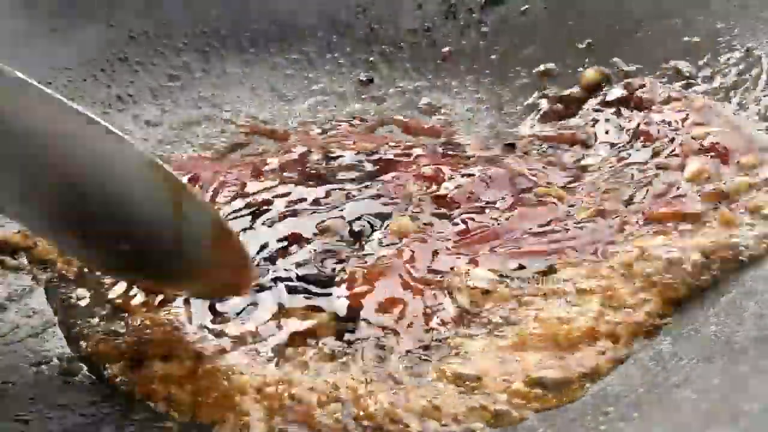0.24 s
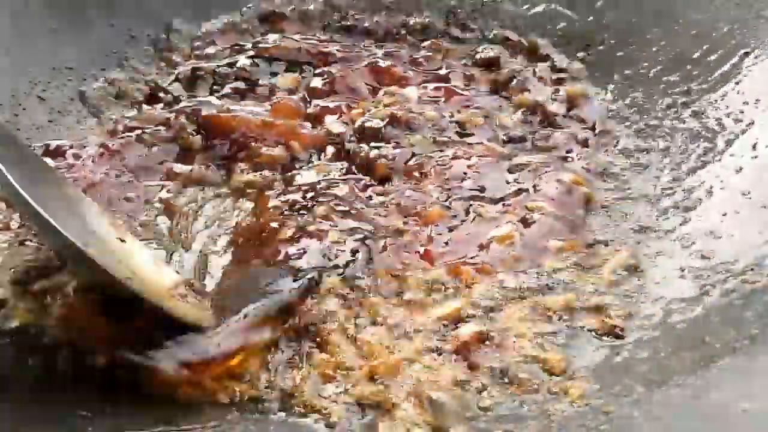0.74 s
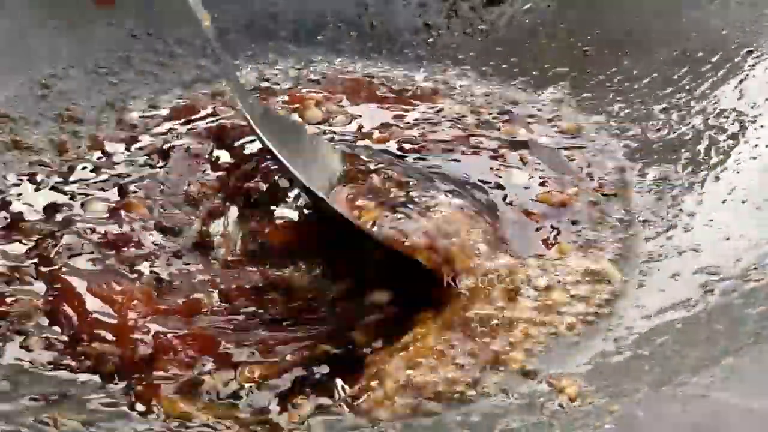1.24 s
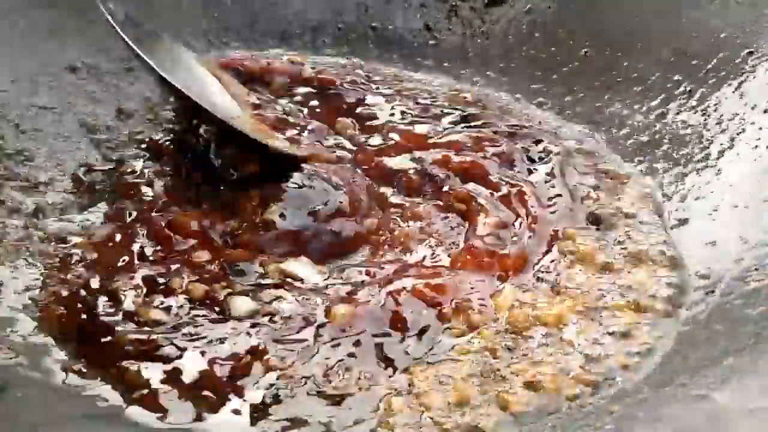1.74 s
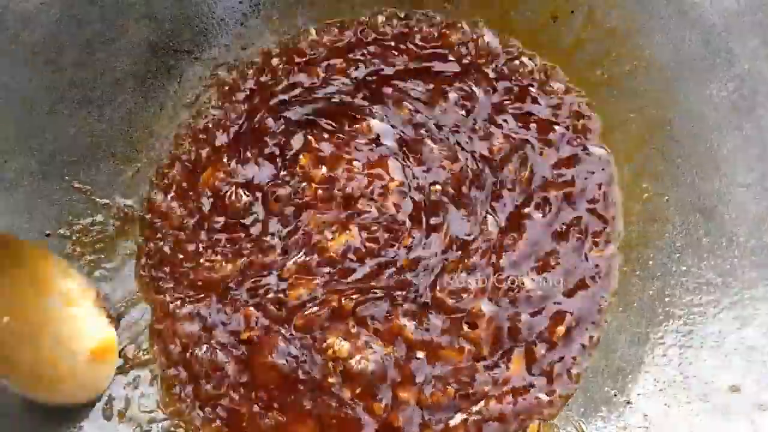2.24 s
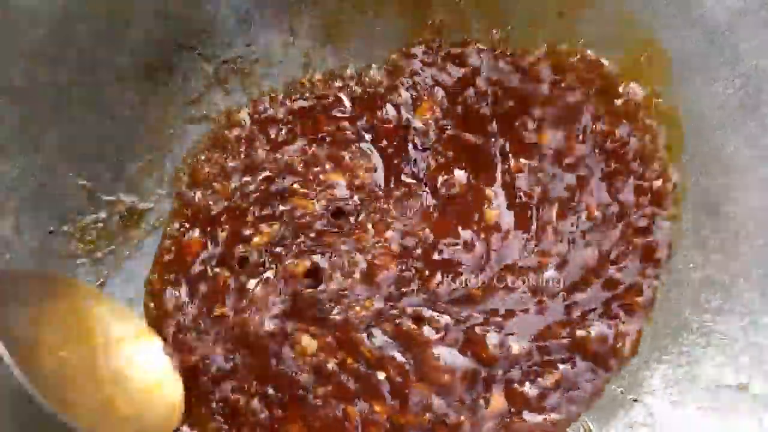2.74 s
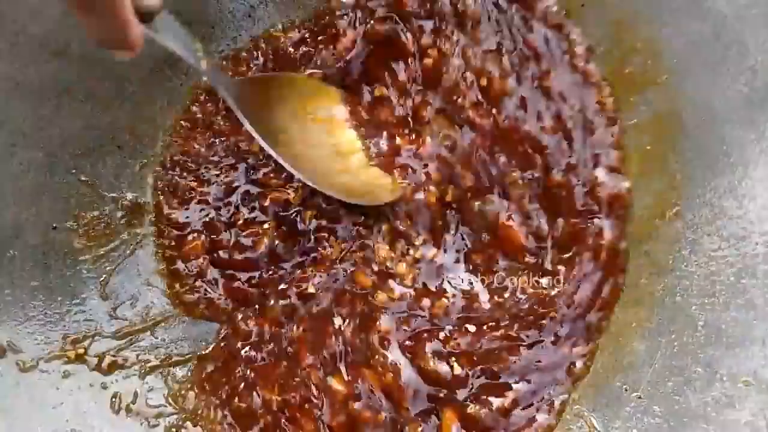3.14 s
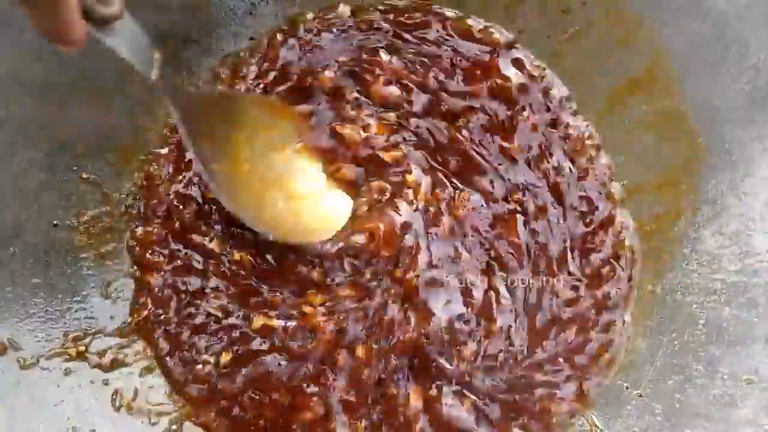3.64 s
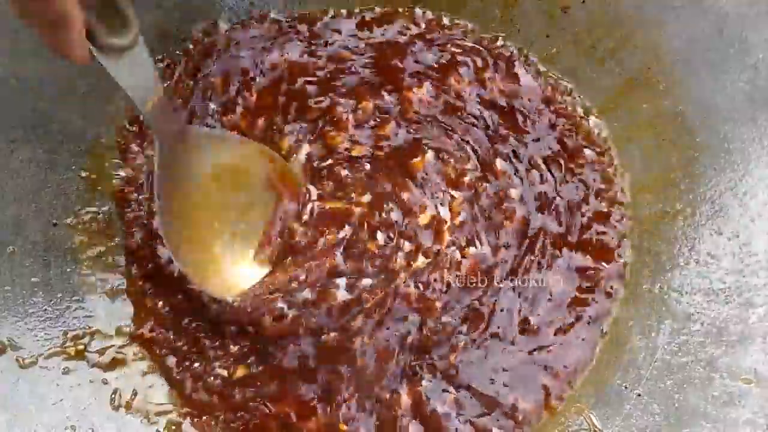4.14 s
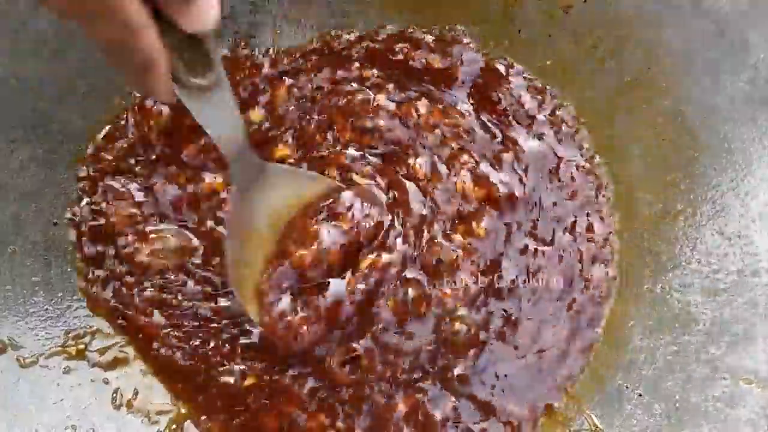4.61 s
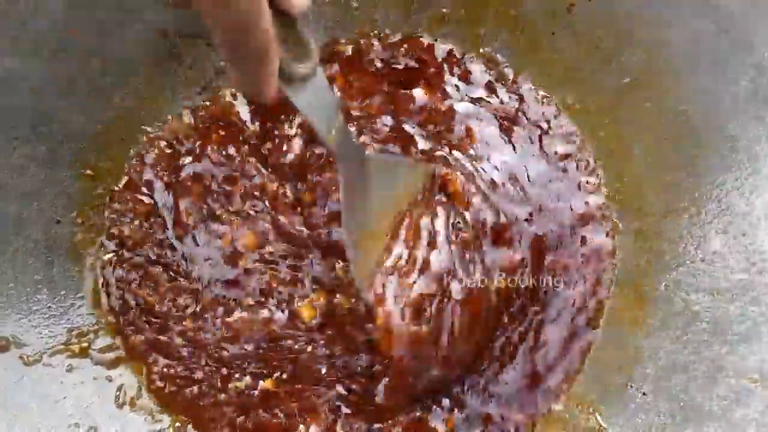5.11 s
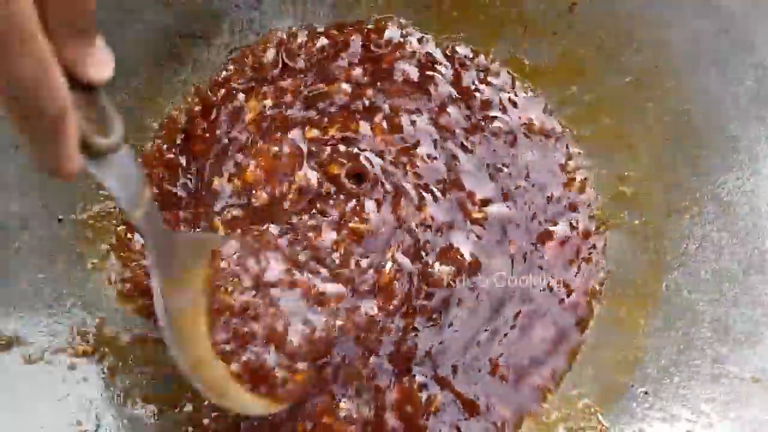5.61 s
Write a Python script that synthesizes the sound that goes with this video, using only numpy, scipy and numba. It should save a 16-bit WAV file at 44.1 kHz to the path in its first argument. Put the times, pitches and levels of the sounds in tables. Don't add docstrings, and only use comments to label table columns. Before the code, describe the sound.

From 0 to about 2.04 s, a fierce bright sizzle fills the close, dry stereo picture: dense spitting and hissing over a faint burner rush, easing slightly around 0.4-0.7 s and swelling again. A metal spoon scrapes the steel wok in uneven strokes, with a hard clack at 0.4 s, a strong gritty scrape near 0.5 s and further knocks at 0.75, 0.9 and 1.25 s. The treble leans left. The sound cuts off abruptly, leaves under a tenth of a second of silence, then a new section fades in over about 0.3 s. The thickened sauce simmers duller and lower, with less spitting and treble now leaning right. Short, hollow, raspy scrapes come several times a second from 2.4 s, mixed with clicks and soft low bowl thumps. Sharp knocks stand out near 5.0 and 5.23 s; a final cluster of scraping and thudding at 5.6-5.75 s leads to the abrupt end.

```python
import sys
import numpy as np
from scipy import signal
from scipy.fft import rfft, irfft, next_fast_len
from scipy.io import wavfile
from scipy.ndimage import uniform_filter1d
from numba import njit

SR = 44100
rng = np.random.default_rng(int(sys.argv[2]) if len(sys.argv) > 2 else 0)


def digitize_waveform(pressure):
    field = np.atleast_2d(pressure).T
    bounded = np.clip(field, -1, 1)
    quanta = np.round(bounded * 32767).astype(np.int16)
    wavfile.write(sys.argv[1], SR, quanta)


def gain_from_db(level_db):
    decades = np.asarray(level_db, float) / 20
    return 10 ** decades


N = 258867

# start in seconds, end in seconds.
PARTS = [
    (0, 2.039),
    (2.1215, 5.87),
]
# scrape level in dB,
# spoon hollow resonance in Hz, wok bowl level in dB, rasp level in dB.
TRAILING_SPOON = [
    (-33.5, 3420, -54.5, -48),
    (-35.5, 2440, -42, -51),
]
BOWL_HZ = 372


def frying(t, part, per_s, patchy_db):
    # time in seconds, level in dB.
    heat_curves = [
        [(0.0, -26.5), (.4, -30), (0.69, -31), (1.0, -26.5), (1.16, -28.5), (1.33, -26), (1.5, -27.5),
         (1.75, -26.5), (2.03, -26)],
        [(2.5, -46.5), (2.77, -50.5), (3.0, -44), (3.6, -49), (4.2, -47.5), (5.25, -48.5), (5.47, -54.5),
         (5.78, -42.5), (5.87, -47)],
    ]
    # frequency in Hz, density in dB per Hz.
    spectra = [
        [(40, -21.5), (200, -19.5), (260, -13), (370, -10), (640, -19.5), (1000, -14.5), (1500, -7.0),
         (2200, -7.5), (3300, -4), (4400, -0.5), (5200, -9), (8000, -11.5), (11000, -11.5), (15500, -18)],
        [(40, -15), (200, -15), (260, -0.5), (370, -4), (640, -4.5), (1000, -6.5), (1500, -6), (2200, -9),
         (3300, -1), (4400, -9), (5200, -9.5), (8000, -25), (11000, -22), (15500, -35.5)],
    ]
    part_level_db = [-24.5, -27]
    zone_centres_hz = [450, 2720, 8600]
    heat_shares = [(.1, .2, 1.24), (.3, .5, 1.27)]
    stir_shares = [(.05, .3, .05), (.1, .35, .2)]

    heat_db = in_time(heat_curves[part], t)[0]
    swell_db = lagging(stirring(t, part)[1], lag_s=0.36)
    zones_db = np.outer(heat_shares[part], heat_db) + np.outer(stir_shares[part], swell_db)
    zones_db -= np.median(zones_db, axis=1, keepdims=True)

    trains = [grains(per_s, 2.16, (3, len(t))) for _ in range(2)]
    trains = [two_ports(train[0], train[1:], part) for train in trains]
    out = 0
    together = drift(5.3, len(t))
    edges = 28 * 2 ** (np.arange(29) / 3)
    for k, (low, high) in enumerate(zip(edges, edges[1:])):
        hz = np.sqrt(low * high)
        shares = [np.interp(np.log(hz), np.log(zone_centres_hz), row) for row in np.eye(3)]
        flicker_db = patchy_db * (0.3 * together + 1.6 * drift(21.0, len(t)))
        gain = gain_from_db(at_hz(spectra[part], hz) + shares @ zones_db + flicker_db)
        out = out + gain * band(trains[k % 2], low, high)
    return out / np.sqrt(np.mean(out[0] ** 2)) * gain_from_db(part_level_db[part])


def stirring(t, part):
    # start in seconds, length in seconds, scrape level in dB,
    # spoon hollow resonance in Hz, wok bowl level in dB.
    thin_strokes = [(0.0, 0.028, -26, 3320, -40.5), (.19, 0.079, -37, 3400, -59),
                    (.47, 0.047, -21.5, 3400, -32), (.54, .11, -27, 3140, -37.5),
                    (.88, .16, -28, 3180, -43.5), (1.12, 0.032, -26.5, 3340, -41),
                    (1.23, .08, -36, 3000, -40.5), (1.38, 0.02, -34.5, 3100, -48),
                    (1.54, 0.15, -34.5, 3230, -47.5), (1.76, 0.036, -35, 3500, -56),
                    (1.92, 0.16, -37, 3300, -43.5)]
    # start in seconds, length in seconds,
    # scrape level in dB, spoon hollow resonance in Hz, wok bowl level in dB.
    thick_strokes = [(2.398, 0.075, -30, 2240, -36), (2.498, 0.055, -29.5, 2330, -45),
                     (2.577, 0.055, -29, 2500, -57), (2.933, 0.082, -27.5, 2100, -31.5),
                     (3.032, 0.099, -28, 2400, -47), (3.207, 0.12, -30, 2490, -50),
                     (3.389, 0.027, -30, 2450, -36), (3.537, 0.05, -27, 2310, -39),
                     (3.677, .1, -35, 2400, -47), (3.963, 0.029, -25.5, 2400, -37),
                     (4.12, 0.038, -35, 2560, -40), (4.238, .07, -30, 2700, -40),
                     (4.353, 0.057, -28, 2350, -40), (4.59, 0.046, -28.5, 2540, -42),
                     (4.672, 0.14, -31, 2400, -39), (4.93, 0.11, -29, 2480, -50),
                     (5.026, 0.085, -28, 2440, -35), (5.165, 0.08, -29, 2330, -43),
                     (5.38, 0.019, -32.5, 2520, -50), (5.615, 0.085, -26, 2460, -31),
                     (5.712, 0.13, -31.5, 2030, -40)]
    attack_s, release_s = 0.029, 0.021

    start, length, db, hz, bowl_db = np.transpose([thin_strokes, thick_strokes][part])[:, :, None]
    rest_db, rest_hz, rest_bowl_db, _ = TRAILING_SPOON[part]
    rise = np.clip((t - start) / attack_s + .5, 0, 1)
    fall = np.exp(-np.maximum(t - start - length, 0) / release_s)
    envelope = (rise * fall) ** 2
    stroke_power = envelope * gain_from_db(2 * db)
    rest_power = gain_from_db(2 * rest_db)
    scrape_power = rest_power + np.sum(stroke_power, axis=0)
    hollow_hz = (rest_power * rest_hz + np.sum(stroke_power * hz, axis=0)) / scrape_power
    bowl_power = gain_from_db(2 * rest_bowl_db) + np.sum(envelope * gain_from_db(2 * bowl_db), axis=0)
    scrape_db = 10 * np.log10(scrape_power)
    return scrape_db, scrape_db - rest_db, hollow_hz, 10 * np.log10(bowl_power)


def scrape(t, part):
    # frequency in Hz, width in Hz, level in dB.
    steel_modes = [(1208, 170, 2.5), (1540, 650, -0.5), (2160, 530, 1.5), (2520, 18, 17.5), (2865, 23, -11),
                   (3600, 54, -2), (3840, 17, 12), (4750, 330, 6.5), (5160, 140, 4.5)]
    bowl_hz = [433, BOWL_HZ][part]

    scrape_db, swell_db, hollow_hz, bowl_db = stirring(t, part)
    rasp_db = TRAILING_SPOON[part][-1] + 0.43 * lagging(swell_db, lag_s=0.092)
    pressure = gain_from_db(1.97 * drift(33.0, len(t)))
    slips = grains(5000, 2.7, (3, len(t))) * pressure

    hollow = glide(slips, hollow_hz, 545)
    steel = 0
    for k, (hz, width_hz, db) in enumerate(steel_modes):
        steel = steel + gain_from_db(db) * resonance(slips, hz, width_hz) * (-1) ** k
    steel = rms_one(steel)
    broad = rms_one(resonance(slips, 2600, 1900))
    bowl = rms_one(resonance(resonance(slips, bowl_hz, 300), bowl_hz, 78))
    rasp = rms_one(band(slips, 4300, 9500))

    body = gain_from_db(scrape_db) * (gain_from_db(1.5) * hollow + gain_from_db(-3.5) * steel + gain_from_db(-21.5) * broad)
    sound = body + gain_from_db(bowl_db) * bowl + gain_from_db(rasp_db + 5.5) * rasp
    return two_ports(sound[0], sound[1:], part)


def knocks():
    # time in seconds, peak level in dB, left over right in dB, centre in Hz.
    edge_knocks = [(0.0337, -12, -7, 4260), (0.395, -5, -6, 4320), (0.7558, -12, 5, 3600),
                   (0.897, -12.5, 11, 2760), (1.243, -20, -1, 3190), (2.4105, -14, -0.5, 2870),
                   (2.9303, -18, 5, 2520), (2.953, -11, 4, 2060), (3.0492, -17, -16, 1540),
                   (3.0847, -12, 0.5, 2510), (3.2116, -11.5, -1, 4600), (3.3645, -15, 8, 2490),
                   (3.403, -17, 8, 2560), (3.5224, -13, 5, 2270), (3.554, -15, 4, 2370),
                   (3.683, -15, 10, 2320), (3.7618, -17.5, 2, 1250), (3.855, -13.5, -9, 2430),
                   (3.986, -25, 6, 2360), (4.22, -19, 1.0, 1250), (4.299, -14, 1, 2590),
                   (4.3686, -17, 6, 2200), (4.587, -15, 12, 2170), (4.9272, -15, 6, 2220),
                   (4.9882, -15.5, 21, 2520), (5.0332, -22, 4.5, 2580), (5.2299, -9, -3, 2330),
                   (5.612, -29, -1, 2260), (5.635, -14, -7, 3620), (5.7483, -17, -6, 1520)]
    # time in seconds, peak level in dB, left over right in
    # dB, centre in Hz, decay in seconds.
    edge_skids = [(0.395, -4.5, 2, 2500, 0.0008), (0.471, -13.5, -5, 5400, 0.036),
                  (0.486, -13.5, 3, 3700, 0.035), (0.56, -15.5, -6, 1945, 0.03),
                  (0.616, -30, -9, 2020, 0.02), (3.357, -15.5, 10, 7200, 0.0081),
                  (3.689, -12.5, -3, 4070, 0.0038), (3.991, -20, -18, 5500, 0.0075),
                  (4.99, -7.5, -2, 3200, 0.0012), (5.445, -28.5, -11, 9700, 0.0058),
                  (2.585, -12.5, 2, 2570, 0.031), (3.266, -20, 8, 2330, 0.017),
                  (3.385, -15.5, 12, 2470, 0.011), (4.284, -21, 19, 2730, 0.02),
                  (4.36, -13, 8, 2310, 0.016), (5.201, -17, 4, 2230, .02), (5.734, -17.5, -8, 1530, 0.029),
                  (5.66, -22, -2, 3300, 0.044)]
    knock_decay_s, thump_decay_s = 0.0052, 0.0094
    thump_db = -19

    out = np.zeros((2, N))
    t = np.arange(round(.1 * SR)) / SR
    touches = [(*row, knock_decay_s, True) for row in edge_knocks]
    touches += [(*row, False) for row in edge_skids]
    grit = rng.standard_normal((len(touches), 3, len(t)))
    for (s, db, pan_db, hz, decay_s, thumping), noise in zip(touches, grit):
        burst = (noise[0] + 0.33 * noise[1:]) * np.exp(-t / max(decay_s, .001))
        burst *= 1 - np.exp(-t * 0.0025 / decay_s ** 2)
        crack = resonance(burst, hz, 0.082 * hz + 0.59 / decay_s)
        crack += 0.024 * resonance(burst, 3100, 4400)
        crack *= gain_from_db(db - 5.0 + pan_db / 2 * np.array([[1], [-1]])) / np.abs(crack).max()
        thump = np.sin(2 * np.pi * BOWL_HZ * t) * np.exp(-t / thump_decay_s)
        thump *= thumping * gain_from_db(db + thump_db)
        i = int(s * SR)
        out[:, i:i + len(t)] += crack + thump
    return out


def thumps():
    # time in seconds, peak level in dB, frequency in Hz.
    bowl_thumps = [(0.395, -17, 434), (1.015, -21, 440), (1.244, -22, 437), (2.127, -21, 308),
                   (2.409, -18, 308), (3.252, -21, 386), (3.546, -23, 337), (3.743, -16, 312),
                   (4.496, -16, 363), (5.231, -15.5, 376), (5.415, -29, 364), (5.605, -15.5, 416),
                   (5.675, -14, 420), (5.747, -13, 400)]
    out = np.zeros(N)
    t = np.arange(round(.06 * SR)) / SR
    envelope = (1 - np.exp(-t / 0.0011)) * np.exp(-t / 0.0087)
    for s, db, hz in bowl_thumps:
        i = int(s * SR)
        out[i:i + len(t)] += gain_from_db(db - 5) * np.sin(2 * np.pi * hz * t) * envelope
    return out


def two_ports(shared, own, part):
    # frequency in Hz, phase in radians.
    lead_curves = [
        [(0, 0.5), (1290, 0.67), (2070, -5.5), (3190, 1.1), (3700, 3), (5000, 0.5), (5770, 13.7), (6630, 20.5),
         (7240, -16), (8010, 7.5), (10200, -4.5), (13300, -7.5), (15000, -29), (15500, -14)],
        [(0, 2.1), (1120, 0.6), (1640, 3.3), (2410, 6.54), (2670, 7.7), (3880, 12.6), (5080, 13.5),
         (5340, 18.1), (8010, 25.5), (10700, 36), (11300, 90), (13000, 16), (14600, 22), (15500, 39)],
    ]
    # frequency in Hz, share of power from 0 to 1.
    coherence = [(40, 0.08), (80, 0.75), (140, .88), (300, 0.96), (640, 0.88), (1400, 0.51), (3000, 0.22),
                 (8000, 0), (15000, 0.1)]
    length = shared.shape[-1]
    size = next_fast_len(length)
    hz = np.arange(size // 2 + 1) * SR / size + 1
    lead = np.interp(hz, *np.transpose(lead_curves[part])) / 2
    lead = lead * np.minimum(hz / 900, 1) ** 2
    alike = np.clip(at_hz(coherence, hz), 0, 1)
    turned = rfft(shared, size) * np.exp(1j * lead * [[1], [-1]])
    both = np.sqrt(alike) * turned + np.sqrt(1 - alike) * rfft(own, size)
    return irfft(both, size)[:, :length]


def grains(per_s, spread_db, shape):
    sizes = gain_from_db(spread_db * np.minimum(rng.exponential(1, shape), 5)) * rng.choice([-1, 1], shape)
    return rms_one(sizes * (rng.random(shape) < per_s / SR) + 1e-9)


def drift(rate, size):
    step = 40
    r = np.exp(-2 * step * np.pi * rate / SR)
    noise = rng.standard_normal(size // step + 2002)
    slow = signal.lfilter([1], [1, -2 * r, r * r], noise)[2000:]
    return np.interp(np.arange(size) / step, np.arange(len(slow)), rms_one(slow))


def lagging(db, lag_s):
    r = np.exp(-1 / (max(lag_s, .001) * SR))
    return signal.lfilter([1 - r], [1, -r], db)


def resonance(x, hz, width_hz):
    r = np.exp(-np.pi * width_hz / SR)
    top = np.array([1, 0, -1]) * (1 - r * r) / 2
    return signal.lfilter(top, [1, -2 * r * np.cos(2 * np.pi * hz / SR), r * r], x)


@njit
def gliding(x, cosine, r):
    y = np.zeros(len(x))
    for i in range(2, len(x)):
        y[i] = x[i] - x[i - 2] + 2 * r * cosine[i] * y[i - 1] - r * r * y[i - 2]
    return y


def glide(x, hz, width_hz):
    cosine, r = np.cos(2 * np.pi * hz / SR), np.exp(-np.pi * width_hz / SR)
    return rms_one(np.array([gliding(row, cosine, r) for row in x]))


def band(x, low_hz, high_hz):
    return signal.sosfilt(signal.butter(2, [low_hz, high_hz], "band", fs=SR, output="sos"), x)


def rms_one(x):
    return x / np.sqrt(np.mean(x ** 2) + 1e-20)


def in_time(rows, t):
    s, *columns = np.transpose(rows)
    return [np.interp(t, s, c) for c in columns]


def at_hz(points, hz):
    table_hz, values = np.array(points)[:, 0], np.array(points)[:, 1]
    return np.interp(np.log(hz), np.log(table_hz + 1), values)


def starved_bands(x, from_hz, top_hz):
    # frequency in Hz, level against neighbours in dB.
    dip_limits = [(2500, -4.2), (4800, -1.8), (8500, -1.7), (10500, -2.2), (12500, -1.2), (15500, -.7)]
    # frequency in Hz, share from 0 to 1.
    empty_shares = [(1500, .004), (4400, .01), (4900, .24), (6500, .2), (8600, .16), (9300, .02),
                    (12000, .02), (12700, .16), (15500, .28)]
    hz, s, cells = signal.stft(x, SR, nperseg=2048)
    power = uniform_filter1d(np.abs(cells) ** 2, size=9, axis=1)
    power = uniform_filter1d(power, size=2, axis=2)
    limit = gain_from_db(2 * at_hz(dip_limits, hz + 1))[:, None] * uniform_filter1d(power, size=45, axis=1)
    jumps = np.round(.8 * rng.standard_normal(len(s) // 2 + 1))
    edge_hz = top_hz + 690 * jumps.repeat(2)[:len(s)]
    chance = rng.random((len(hz) // 10 + 1, len(s) // 3 + 1)).repeat(10, axis=0).repeat(3, axis=1)
    chance = chance[:len(hz), :len(s)]
    bin_hz = hz[:, None]
    empty = chance < at_hz(empty_shares, hz + 1)[:, None] * (bin_hz > 1400)
    dipped = (power < limit) & (bin_hz > from_hz)
    dropped = empty | dipped | (bin_hz > edge_hz)
    return signal.istft(cells * np.where(dropped, .02, 1), SR, nperseg=2048)[1][:, :N]


def scene():
    # frequency in Hz, width in Hz, gain in dB.
    tone_bands = [
        [(196, 84, -6), (815, 130, 5.5), (2080, 990, 2.5)],
        [(210, 54, -7), (596, 43, 4), (1233, 110, 5), (1554, 100, 2.5)],
    ]
    # frequency in Hz, width in Hz, gain in dB.
    port_modes = [
        [(1670, 1600, -3), (8090, 720, 4), (10850, 1270, 19.5)],
        [(2400, 1500, -3), (8430, 2400, -3.5), (10660, 2800, 9)],
    ]
    out = np.zeros((2, N))
    touches = knocks() + thumps()
    for part, (start, end) in enumerate(PARTS):
        a, b = round(start * SR), min(round((end + .04) * SR), N)
        t = np.arange(a, b) / SR
        sound = frying(t, part, per_s=[22000, 12000][part], patchy_db=[.8, 1.2][part])
        sound = sound + scrape(t, part) + touches[:, a:b]
        for hz, width_hz, db in tone_bands[part]:
            sound += (gain_from_db(db) - 1) * resonance(sound, hz, width_hz)
        for hz, width_hz, db in port_modes[part]:
            sound[part] += (gain_from_db(db) - 1) * resonance(sound[part], hz, width_hz)
        out[:, a:b] = sound
    return out


def band_limit(x):
    return signal.sosfilt(signal.butter(12, 15910, fs=SR, output="sos"), x)


def record(dry):
    # time in seconds, level in dB.
    cut_tail = [(2.0385, 0), (2.0395, -24), (2.05, -30), (2.056, -60), (2.065, -120)]
    fade_from_db, fade_s, fade_bend = -13, 0.29, 1.6
    t = np.arange(N) / SR
    second_start = PARTS[1][0]
    fade = gain_from_db(fade_from_db * np.clip(1 - (t - second_start) / fade_s, 0, 1) ** fade_bend)
    gain = np.where(t < second_start, gain_from_db(in_time(cut_tail, t)[0]), fade)
    rounded = 0.61 * np.tanh(dry / 0.79)
    mix = starved_bands(rounded, from_hz=2700, top_hz=15700) * gain
    return band_limit(mix)


dry = scene()
out = record(dry)
digitize_waveform(out)
```